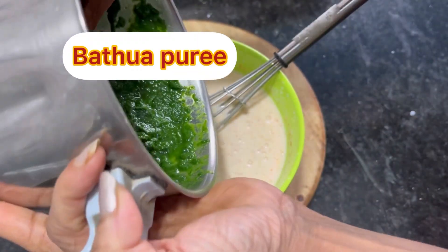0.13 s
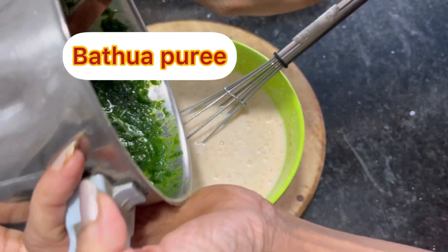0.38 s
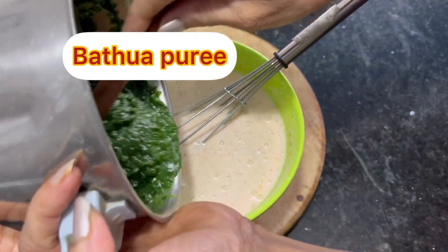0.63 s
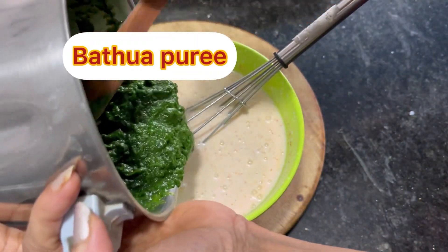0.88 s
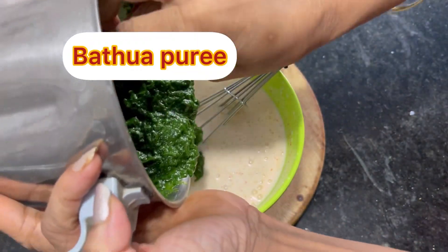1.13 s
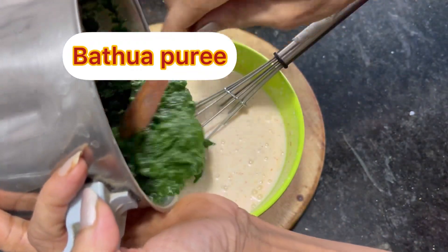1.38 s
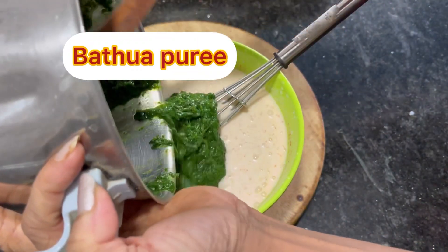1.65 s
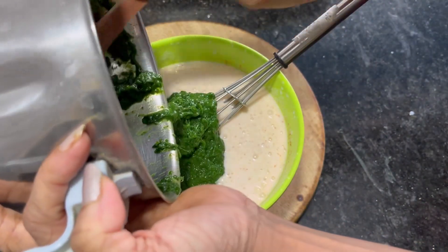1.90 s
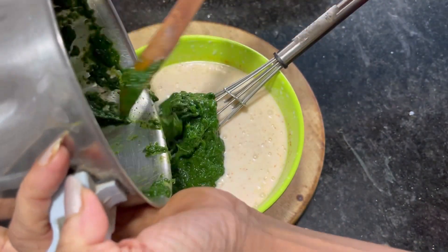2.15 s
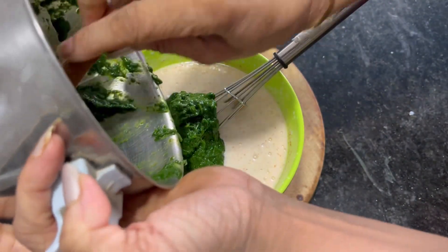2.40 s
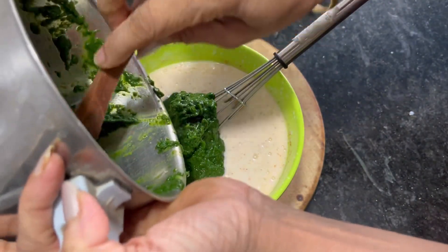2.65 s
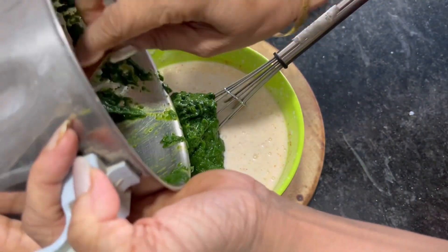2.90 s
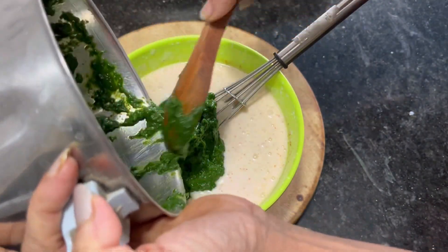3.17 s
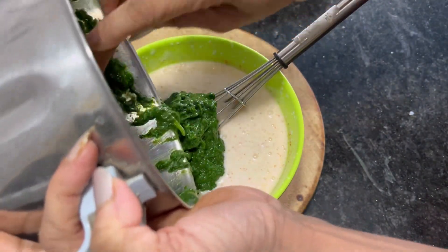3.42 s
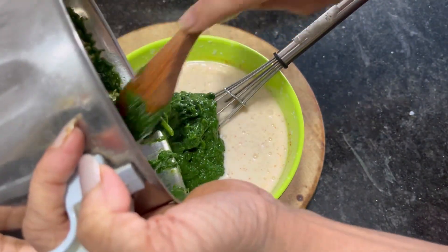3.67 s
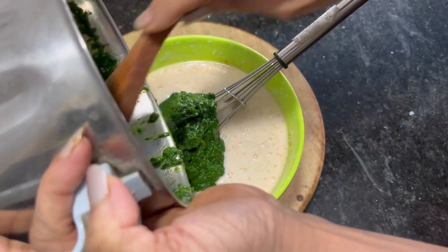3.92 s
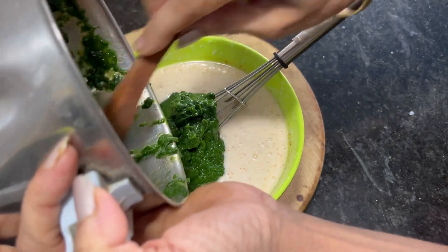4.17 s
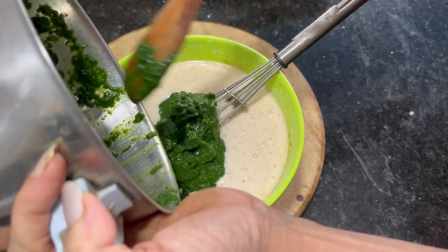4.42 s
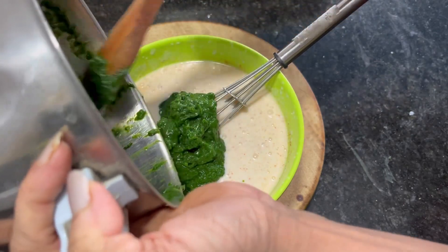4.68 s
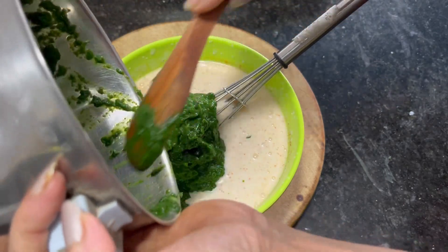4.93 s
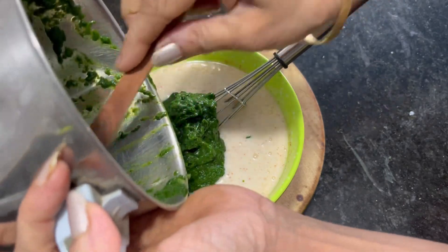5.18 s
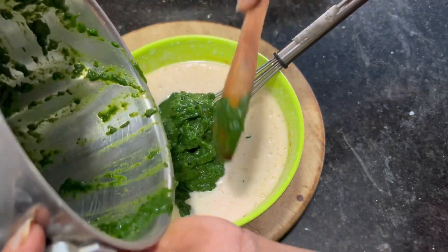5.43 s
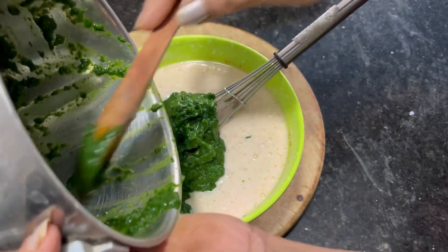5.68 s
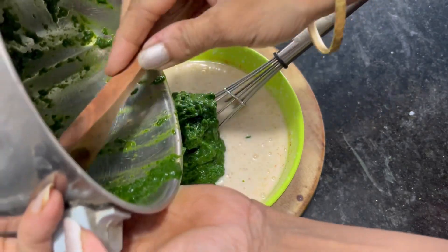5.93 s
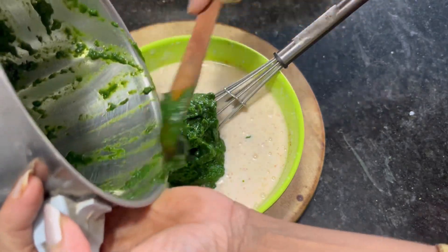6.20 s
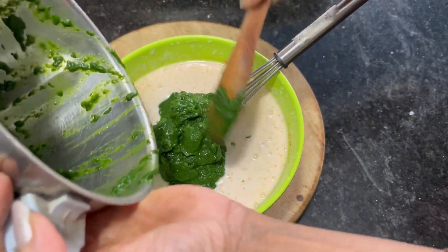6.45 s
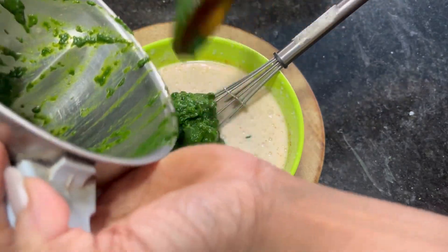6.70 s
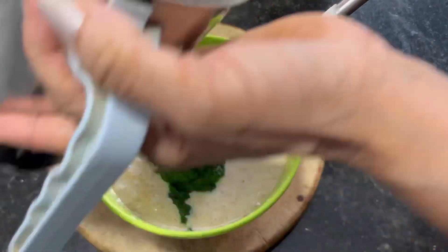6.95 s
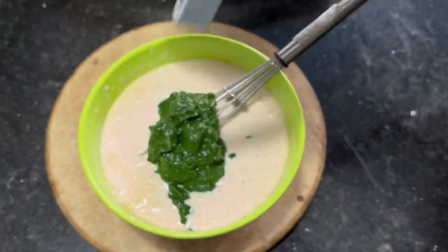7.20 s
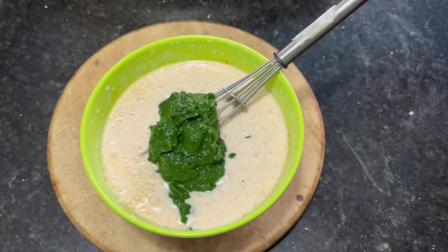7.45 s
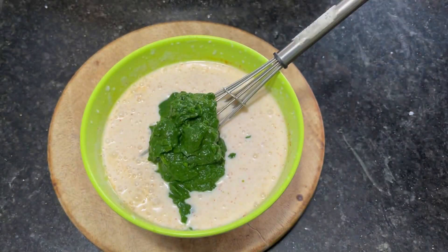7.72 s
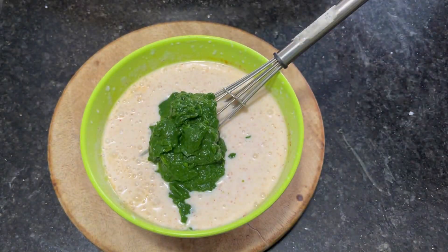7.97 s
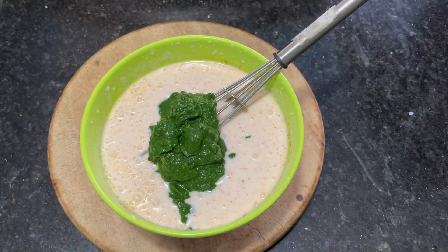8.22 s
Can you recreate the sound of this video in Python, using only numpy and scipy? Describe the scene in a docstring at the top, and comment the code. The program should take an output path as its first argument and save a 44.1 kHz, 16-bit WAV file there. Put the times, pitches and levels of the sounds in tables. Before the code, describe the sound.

A wooden spatula knocks and scrapes thick puree from a steel jar with dull wet slaps, then the jar bangs down on a counter.

```python
"""In a kitchen, a wooden spatula scrapes thick puree out of a steel jar held close to a two-port microphone.
It knocks the jar wall (dying wall modes), slaps dully through the puree (the hollow rings and is choked)
and rubs the steel (gliding tones), with short skids, cracks and a faint clink (dying bands of noise).
The jar is then banged and set down on a counter (slab modes and clatter). Behind: a far crow (rasping
partials), room rumble and a steady hiss (both shaped noise)."""
import sys
import numpy as np
from scipy import signal
from scipy.io import wavfile
from scipy.ndimage import uniform_filter1d

SR = 44100
rng = np.random.default_rng(int(sys.argv[2]) if len(sys.argv) > 2 else 0)


def put_to_file(sound):
    """Save the sound as 16-bit audio at rate SR, in the file named by the first command-line argument."""
    columns = np.atleast_2d(sound).T  # one column per channel
    safe = np.clip(columns, -1, 1)
    whole_steps = np.round(safe * 32767)
    wavfile.write(sys.argv[1], SR, whole_steps.astype(np.int16))


def gain_from_db(level_db):
    """Turn a decibel level (scalar or array-like) into a linear amplitude factor."""
    decades = np.asarray(level_db, float) / 20
    return 10 ** decades


N = 367794  # length in samples
HALF_S = np.arange(SR // 2) / SR  # half a second of time, in seconds, for the short sounds


def evened(x):
    """Scales to rms 1."""
    return x / np.sqrt(np.mean(x ** 2) + 1e-20)


def read(points, hz):
    """Reads a curve of (Hz, value) points on a log-frequency axis."""
    f, value = np.transpose(points)
    return np.interp(np.log(hz + 1), np.log(f + 1), value)


def add(mix, s, sound):
    """Mixes a two-channel sound in at time s, in seconds."""
    part = mix[:, round(s * SR):][:, :sound.shape[1]]
    part += sound[:, :part.shape[1]]


def panned(x, db):
    """Splits a sound over two channels, the left one louder than the right by db."""
    return x * gain_from_db([[db / 2], [-db / 2]])


def resonate(x, hz, width_hz):
    """Keeps a band around the curve hz: shifts it down to zero, smooths, and shifts back."""
    turn = np.exp(2j * np.pi * np.cumsum(hz * np.ones(len(x))) / SR)
    r = np.exp(-np.pi * width_hz / SR)
    return 2 * (turn * signal.lfilter([1 - r], [1, -r], x / turn)).real


def noise_band(noise, hz, width_hz):
    """Noise narrowed twice around one pitch, for steeper sides."""
    return resonate(resonate(noise, hz, width_hz), hz, width_hz)


def ring(hz, t60, rise_s):
    """One mode with a soft start, dying by 60 dB in t60 seconds."""
    fade = gain_from_db(-60 * HALF_S / max(t60, .004))
    return np.sin(2 * np.pi * hz * HALF_S) * fade * (1 - np.exp(-HALF_S / rise_s))


def burst(hz, width_hz, t60):
    """A short crack of coloured noise, peak near 1."""
    noise = noise_band(rng.standard_normal(SR // 2), hz, width_hz)
    return evened(noise) * gain_from_db(-60 * HALF_S / t60 - 6.5)


# Spatula on bare steel. Each row: start in seconds, blow in dB, pitch of the main wall mode in Hz,
# high modes in dB, time until the ring is stifled in seconds.
KNOCKS = [(1.749, -44, 1790, -14, 0.02), (2.6138, -14, 1826, -3, 0.0063), (3.4256, -34, 1744, -17, 0.013),
          (3.559, -50.5, 1850, 6, 0.013), (4.0467, -22.5, 1804, -4.5, 0.0099),
          (4.5415, -9.5, 1877, -12.5, 0.014), (5.1068, -22.5, 1780, -3.5, 0.0092),
          (5.888, -51.5, 1830, -1, 0.019), (6.189, -46.5, 1880, -9, 0.048), (6.299, -51, 1900, 4, 0.015),
          (7.0505, -6.5, 1905, 0.5, 0.029), (7.1055, -14.5, 1915, -2.5, 0.013),
          (7.2659, -24.5, 1820, -6, 0.0091), (7.3038, -27.5, 1916, -13, 0.0071)]
# Wall modes of the jar. Each row: pitch in Hz, level in dB, time to die by 60 dB in seconds if left free,
# left over right in dB. The second is the main one; each knock sets its pitch anew.
WALL_MODES = [(1272, -17, 0.58, 19), (1884, -2.5, 0.2, -7), (2287, -12.5, 0.11, -6.5), (2770, -25, 0.02, 2),
              (2928, -15.5, 0.071, -11), (3320, -21, 0.045, -12), (3953, -12, 0.05, 3.5),
              (4260, -18, 0.047, -7), (4950, -18, 0.028, 4.5), (5100, -12, 0.021, -2.5)]
LOW_MODE_DB, LOW_FOLLOWS_HIGH = -5, 0.65  # the lowest wall mode follows the high ones in part


def knock(db, main_hz, high_db, free_s):
    """A blow rings the wall modes until spatula or hand settles on the wall and stifles them."""
    out = np.zeros((2, SR // 2))
    low_db = LOW_MODE_DB + LOW_FOLLOWS_HIGH * high_db
    grip_db = 16 * np.log10(np.clip(free_s / 0.014, .1, 1))  # the sooner stifled, the more firmly
    for k, (hz, mode_db, t60, pan_db) in enumerate(WALL_MODES):
        tilt_db, rise_s = (high_db if k else low_db), .0006
        if k == 1:
            hz, tilt_db, rise_s = main_hz, 0, .002
        held_db = 1.1 * grip_db * (k > 4)  # a firm grip mutes the top modes from the start
        out += panned(gain_from_db(mode_db + tilt_db + held_db) * ring(hz, t60, rise_s), pan_db)
    settled = 1 / (1 + np.exp((free_s - HALF_S) / .002))
    out *= gain_from_db(-(15.5 - grip_db + 170 * HALF_S) * settled)  # a sudden drop, then faster dying
    buzz = burst(main_hz, 170, 0.18)  # the stifled wall buzzes on roughly
    add(out, free_s, panned(gain_from_db(-19.5 + grip_db) * buzz, -7.5))
    crack_db = high_db - 3.5 - 14 * np.log10(max(free_s, .002) / 0.019)  # quickly stifled: harder crack
    crack = ring(2445, 0.0088, 0.000304) + ring(2635, 0.008, 0.0003)
    add(out, 0, panned(gain_from_db(crack_db) * crack, -1.5))
    add(out, 0, panned(gain_from_db(crack_db - 13) * burst(2670, 1100, 0.056), -1.5))
    add(out, 0, panned(gain_from_db(-24) * burst(2950, 200, 0.082), -4.5))  # a rough clang above the main mode
    return gain_from_db(db) * out


# Blows that sound the hollow of the jar. Each row: start in seconds, level in dB, pitch of the hollow in Hz,
# its dying time in seconds (stretched, then choked, below), wet tick against the blow in dB.
SLAPS = [(1.098, -32.5, 511, 0.047, 0), (1.12, -18.5, 680, 0.042, -15), (1.168, -35, 670, 0.032, -19),
         (1.749, -40, 690, 0.047, -23), (1.985, -43, 777, 0.032, -11), (2.07, -40.5, 684, 0.044, -18),
         (2.371, -44.5, 596, 0.033, -23), (2.41, -38.5, 430, 0.025, -27), (2.612, -27, 595, 0.018, -27),
         (2.825, -30.5, 517, 0.045, -14), (2.835, -35.5, 413, 0.097, -24), (2.865, -32.5, 630, 0.033, -6),
         (2.877, -21, 687, 0.037, -18), (3.424, -35, 817, 0.021, -22), (3.45, -32, 620, 0.015, -5.5),
         (3.557, -47, 740, 0.026, -20), (4.047, -28.5, 630, 0.015, -22), (4.54, -24, 733, 0.037, -11),
         (4.761, -42, 790, 0.038, -2), (5.106, -33, 685, 0.067, -18), (5.322, -51, 655, 0.04, -20),
         (5.362, -45.5, 676, 0.046, -16), (5.887, -49.5, 668, 0.072, -20), (7.049, -23.5, 764, 0.052, -20),
         (7.104, -20, 730, 0.023, -31), (7.265, -18.5, 716, 0.088, -8), (7.303, -20.5, 780, 0.019, -10),
         (7.315, -31, 720, 0.035, -5)]
# The jar mouth faces left until the jar is lifted away: left over right in dB, and the moment in seconds.
HOLLOW_PAN_DB, LIFTED_PAN_DB, LIFTED_S = 5, -2, 6.8


def slap(db, hz, t60, tick_db, pan_db):
    """A soft blow sounds the hollow of the jar, choked ever faster, over a low push, a slosh and a wet tick."""
    choke = np.exp(-(HALF_S / (0.35 * t60)) ** 3)
    hollow = ring(hz, 1.3 * t60, 0.0012) * choke
    push = 0.3 * ring(hz * 0.592, 0.022, 0.00035)
    out = panned(hollow + push, pan_db)
    slosh = gain_from_db(-8) * burst(hz * 0.86, 500, 0.11)
    add(out, 0, panned(slosh, pan_db))
    tick = gain_from_db(tick_db) * burst(2040, 1500, 0.028)
    add(out, 0, panned(tick, -1.4))
    return gain_from_db(db) * out


# Wet rubbing that sings in the hollow. Each row: start in seconds, length in seconds, level at the peak
# of the swell in dB, top pitch in Hz, end pitch in Hz.
RUBS = [(3.03, 0.12, -56.5, 765, 643), (3.59, 0.113, -51.5, 672, 660), (4.15, 0.143, -54.5, 835, 715),
        (4.275, 0.033, -57.5, 700, 700)]
SCOOP, SCOOP_END = 0.124, .3  # starts this share below the top pitch; reaches it at this share of the length
SWELL_DB, SWELL_SKEW = 17, 1.32  # the level swells from this far down to a late peak


def rub(length, db, top_hz, end_hz):
    """Stick-slip locks to the hollow: a slightly fuzzy tone scoops up, then glides to its end pitch."""
    u = np.arange(0, length, 1 / SR) / length
    hz = np.interp(u, [0, SCOOP_END, 1], [top_hz * (1 - SCOOP), top_hz, end_hz])
    swell_db = SWELL_DB * (np.sin(np.pi * u ** SWELL_SKEW) - 1)
    fuzz = evened(resonate(rng.standard_normal(len(hz)), hz, 60))
    tone = np.sqrt(2) * np.sin(2 * np.pi * np.cumsum(hz) / SR) + .55 * fuzz
    soft_ends = signal.windows.tukey(len(hz), .2)
    return panned(gain_from_db(db + swell_db) * tone * soft_ends, 7.5)


# Short dry noises: skids on steel, the sharp cracks of hard blows and one faint narrow clink.
# Each row: start in seconds, level in dB, centre in Hz, width in Hz, time to die by 60 dB in seconds.
DRY_NOISES = [(.474, -35, 1840, 630, 0.18), (.474, -44, 560, 500, 0.2), (.488, -44, 2100, 1100, 0.4),
              (1.167, -36, 2450, 1800, 0.023), (1.482, -40, 3020, 700, 0.017),
              (1.749, -44.5, 1300, 1500, 0.056), (1.99, -47, 1500, 1500, 0.081),
              (1.997, -40.5, 1900, 500, 0.14), (1.997, -33.5, 5900, 4000, 0.039),
              (2.862, -42, 2740, 2500, 0.069), (3.4256, -40, 1470, 1500, 0.093),
              (4.26, -52.5, 1920, 300, 0.28), (4.768, -45.5, 2410, 120, 0.15),
              (7.0505, -22, 5600, 2450, 0.023), (7.304, -33, 3900, 1470, 0.095),
              (7.304, -26.5, 623, 600, 0.13), (8.0935, -22, 2110, 1200, 0.023)]


def dry_noise(db, hz, width_hz, t60):
    """A dying band of noise, wide for a skid or crack, narrow for the clink."""
    return panned(gain_from_db(db) * burst(hz, width_hz, t60), -6.0)


# The jar meets the counter and rocks. Each row: start in seconds, level in dB,
# brightness in dB gained at 2000 Hz (in proportion elsewhere).
SET_DOWN = [(8.0925, -8.5, 0.5), (8.099, -8.5, -4), (8.117, -23, 0.5), (8.186, -23.5, -3),
            (8.28, -24.5, -10)]
# Modes of the counter slab. Each row: pitch in Hz, level against the others in dB,
# time to die by 60 dB in seconds (cut to 0.2 at most below).
COUNTER = [(135.5, -6.5, 0.3), (196, -8.5, 0.37), (529, -7.5, 0.2), (847, -10, 0.23), (1238, -33, 0.1),
           (1440, -22, 0.28), (1986, -9, 0.7), (2210, -12, 0.14), (2670, -36, 0.15), (2930, -35, 0.35),
           (3250, -17, 0.087), (3720, -33, 0.27), (4660, -33, 0.54)]
# Colour of the clatter. Each row: frequency in Hz, relative level in dB per Hz.
CLATTER = [(80, -29), (150, 0.5), (260, -3), (600, -7), (1200, -12), (2100, -5), (4200, -18.5), (7000, -27),
           (14000, -112)]
# How long the clatter lasts. Each row: frequency in Hz, time to die by 60 dB in seconds.
CLATTER_T60 = [(150, 0.23), (600, 0.24), (2000, 0.14), (6000, 0.11)]


def set_down(db, bright_db):
    """The jar base hits the counter: slab modes under a wide clatter whose treble dies first."""
    modes = 1.9 * ring(286, 0.05, 0.0033)  # the dull body of the thump
    for hz, mode_db, t60 in COUNTER:
        modes = modes + gain_from_db(mode_db + bright_db * hz / 2000) * ring(hz, min(t60, .2), 0.0019)
    noise = rng.standard_normal((2, SR // 2))
    noise = noise + 0.41 * noise[::-1]  # the channels are partly alike
    hz, t, z = signal.stft(noise, SR, nperseg=512)
    colour = evened(gain_from_db(read(CLATTER, hz))) * gain_from_db(bright_db * hz / 2000)
    fade = gain_from_db(-60 * t / read(CLATTER_T60, hz)[:, None])
    clatter = signal.istft(z * colour[:, None] * fade, SR, nperseg=512)[1][:, :SR // 2]
    onset = 1 - np.exp(-HALF_S / 0.0007)
    return gain_from_db(db) * (0.12 * modes + 0.23 * clatter * onset)


# The far crow. Each row: start in seconds, length in seconds, level in dB before distance weakens it,
# top pitch of the strong second partial in Hz.
CAWS = [(4.808, 0.25, -59.5, 2096), (5.342, 0.24, -61, 2106), (6.436, .27, -60, 2115)]
# Partials of its voice. Each row: multiple of the base pitch, level in dB.
CROW = [(1, -3.5), (2, 2)]
CAW_RISE_S, CAW_FADE_DB, CAW_ARCH = 0.011, -8.5, 0.0526  # quick rise, late fade, a shallow pitch arch


def caw(length, db, top_hz):
    """A hoarse call: two wobbling partials, the second chopped by a slower oscillator."""
    t = np.arange(0, length, 1 / SR)
    hz = top_hz * (1 - CAW_ARCH + CAW_ARCH * np.sin(np.pi * (t / length) ** 0.727))
    rise, close = np.minimum(t / CAW_RISE_S, 1), np.minimum((length - t) / .01, 1)
    shape = rise * gain_from_db(db + CAW_FADE_DB * (t / length) ** 3) * close
    wobble = evened(uniform_filter1d(rng.standard_normal(len(hz)), size=300))
    turns = np.cumsum(hz / 2 * (1 + .016 * wobble)) / SR  # cycles of the base pitch
    rasp = np.cos(2 * np.pi * 125 * t + 0.93 * wobble)
    voice = 0
    for k, part_db in CROW:
        chop = 1 + 1.7 * (k - 1) * rasp
        voice = voice + gain_from_db(part_db) * chop * np.sin(2 * np.pi * k * turns)
    return panned(shape * voice, -8.0)


# How long the room rings. Each row: frequency in Hz, time to die by 60 dB in seconds.
KITCHEN = [(200, 0.66), (700, 0.39), (2000, 0.33), (5000, 0.37), (10000, 0.14)]


def kitchen(x):
    """Room echo: sparse taps of random sign, each band dying at its own speed."""
    taps = np.zeros((2, SR // 2))
    # one tap at a random place in every 20 samples, after a gap of 400
    at = np.arange(400, SR // 2 - 20, 20) + rng.integers(0, 20, (2, (SR // 2 - 401) // 20))
    np.put_along_axis(taps, at, rng.choice([-1., 1.], at.shape), 1)
    hz, t, z = signal.stft(taps, SR, nperseg=256)
    fade = gain_from_db(-60 * t / read(KITCHEN, hz)[:, None])
    tail = signal.istft(z * fade, SR, nperseg=256)[1]
    tail = tail + .5 * tail[::-1]
    return signal.fftconvolve(x.mean(0)[None], tail / np.linalg.norm(tail[0]), axes=1)[:, :N]


def noise_pair(points, same, turn, patchy_db):
    """Random short-time spectra with drifting patches; the right port is part alike, then multiplied by turn."""
    frames, hz = N // 256 + 5, np.fft.rfftfreq(1024, 1 / SR)
    a, b, c, d, patches = rng.standard_normal((frames, 513, 5)).T
    patches = uniform_filter1d(uniform_filter1d(patches, size=12, axis=0), size=14, axis=1)
    same = np.clip(same(hz), -1, 1)[:, None]
    left, other = a + 1j * b, c + 1j * d
    right = (same * left + np.sqrt(1 - same ** 2) * other) * turn(hz)[:, None]
    z = np.array([left, right]) * gain_from_db(read(points, hz)[:, None] + patchy_db * evened(patches))
    return evened(signal.istft(z, nperseg=1024, noverlap=768)[1][:, :N])


# Colour of the rumble. Each row: frequency in Hz, relative level in dB per Hz.
RUMBLE = [(15, -17), (25, -8.5), (123, -2), (243, -13), (281, -23.5), (318, -28), (383, -18), (471, -23),
          (616, -25.5), (683, -22), (1080, -27.5), (1350, -28.5), (3500, -24), (4550, -27.5), (7700, -120)]
# Each row: frequency in Hz, likeness of left and right from 0 to 1.
SAME = [(60, 0.99), (210, 1), (330, 0.15), (1200, 0.094), (1800, 0.85), (2600, 0.71)]
# Each row: frequency in Hz, left over right in dB.
LEAN = [(60, -1), (160, 5), (330, -3), (900, 7.5), (1800, -9), (2700, 9)]
# Steady fuzzy bands in the air. Each row: centre in Hz, width in Hz, level in dB.
HUMS = [(1326, 140, -72), (1699, 28, -70.5)]
RUMBLE_DB = -55


def rumble():
    """Traffic and house noise, near mono in the bass, with two fuzzy bands."""
    likeness = lambda hz: read(SAME, hz)
    right_gain = lambda hz: gain_from_db(-read(LEAN, hz))
    air = gain_from_db(RUMBLE_DB) * noise_pair(RUMBLE, likeness, right_gain, 1.1)
    for hz, width_hz, db in HUMS:
        band = np.array([noise_band(v, hz, width_hz) for v in rng.standard_normal((2, N))])
        air += gain_from_db(db) * evened(band)
    return air


# Colour of the hiss. Each row: frequency in Hz, relative level in dB per Hz.
HISS = [(1500, -15), (2500, -9), (3500, -5), (4800, 0.5), (6500, 3), (9000, -0.5), (12000, -3),
        (15000, -7.5), (16500, -29)]
# Lead of the right port. Each row: frequency in Hz, lead in cycles.
HISS_TURN = [(4000, 0), (8350, 0.438), (12050, 1.083), (15300, 1.43)]
HISS_DB = -52.5


def hiss():
    """One steady hiss reaches the right port a little early: a phase lead in the treble."""
    turn = lambda hz: np.exp(2j * np.pi * read(HISS_TURN, hz))
    return gain_from_db(HISS_DB) * noise_pair(HISS, np.ones_like, turn, 0.93)


def scene():
    """Near jar sounds and the far crow in the kitchen, over the background."""
    near, far = np.zeros((2, 2, N))
    for table, source in ((KNOCKS, knock), (RUBS, rub), (DRY_NOISES, dry_noise), (SET_DOWN, set_down)):
        for s, *row in table:
            add(near, s, source(*row))
    for s, *row in SLAPS:
        add(near, s, slap(*row, HOLLOW_PAN_DB if s < LIFTED_S else LIFTED_PAN_DB))
    for s, *row in CAWS:
        add(far, s, caw(*row))
    echo = kitchen(gain_from_db(-14.0) * near + gain_from_db(-7.0) * far)
    return near + 0.5 * far + echo + rumble() + hiss()


def band_limit(x):
    """A steep low-pass at the top of the band."""
    return signal.sosfilt(signal.butter(12, 15220, fs=SR, output="sos"), x)


def record(dry):
    """The microphone rolls off the deep bass, below about 42 Hz."""
    bass_cut = signal.butter(4, 42, "high", fs=SR, output="sos")
    trimmed = signal.sosfilt(bass_cut, dry)
    return band_limit(trimmed)


dry = scene()
out = record(dry)
put_to_file(out)
```